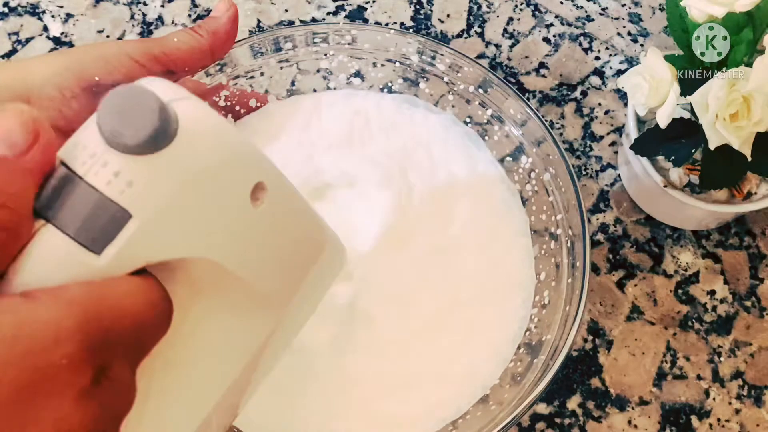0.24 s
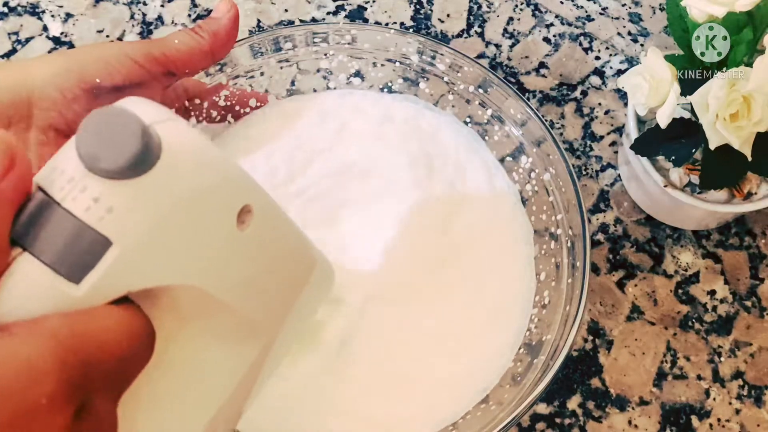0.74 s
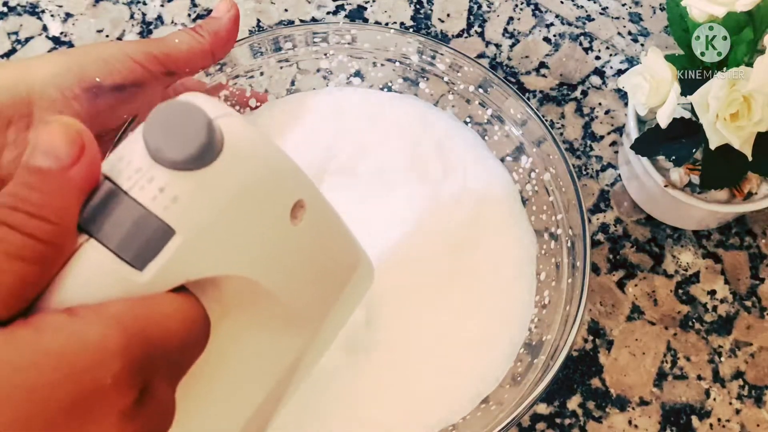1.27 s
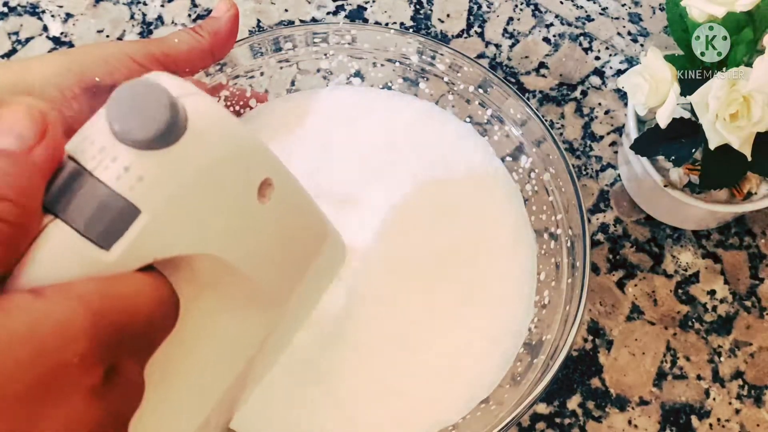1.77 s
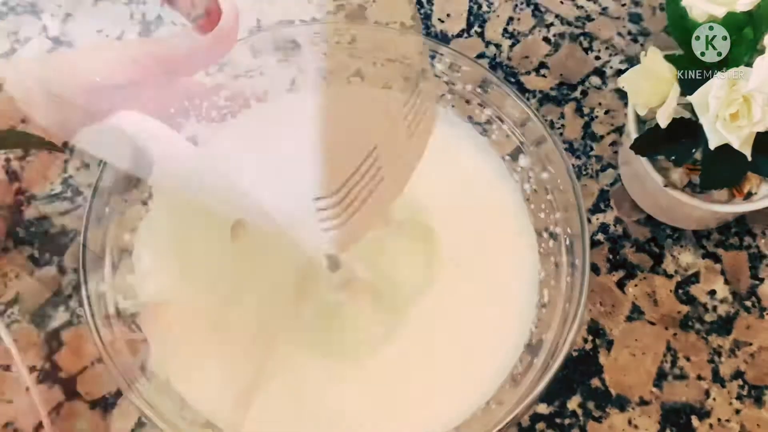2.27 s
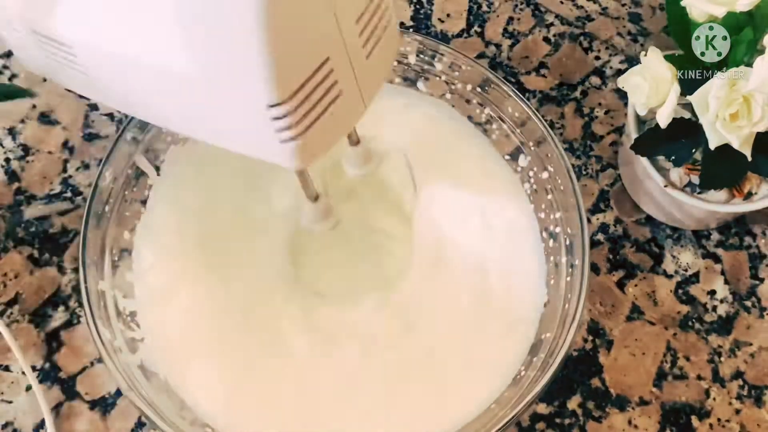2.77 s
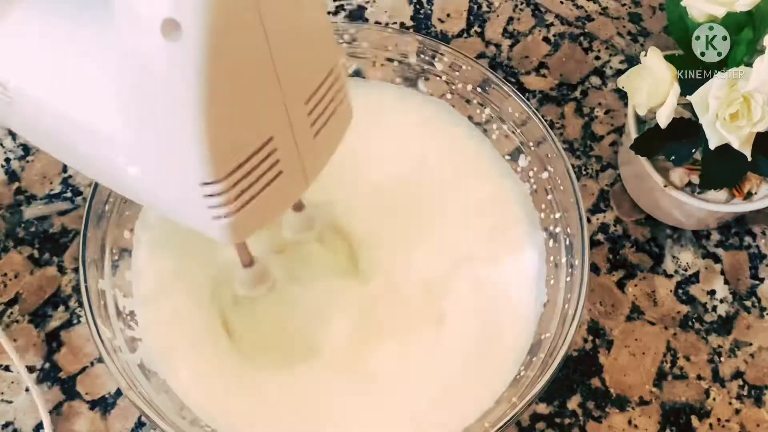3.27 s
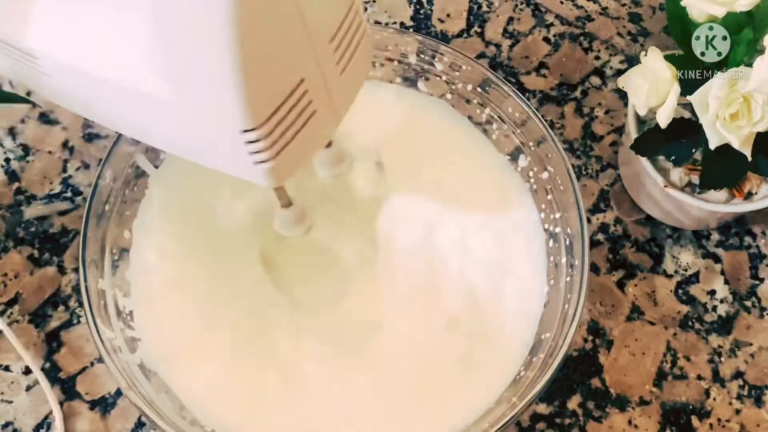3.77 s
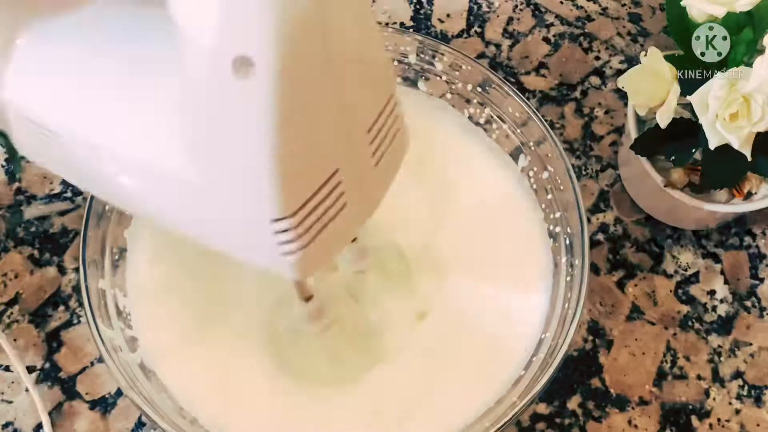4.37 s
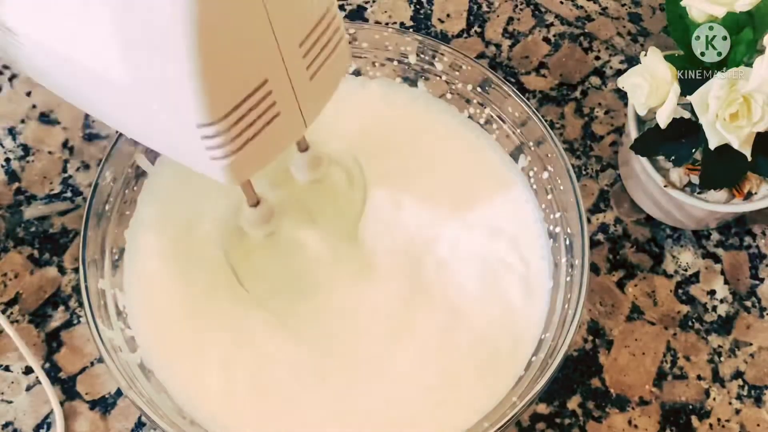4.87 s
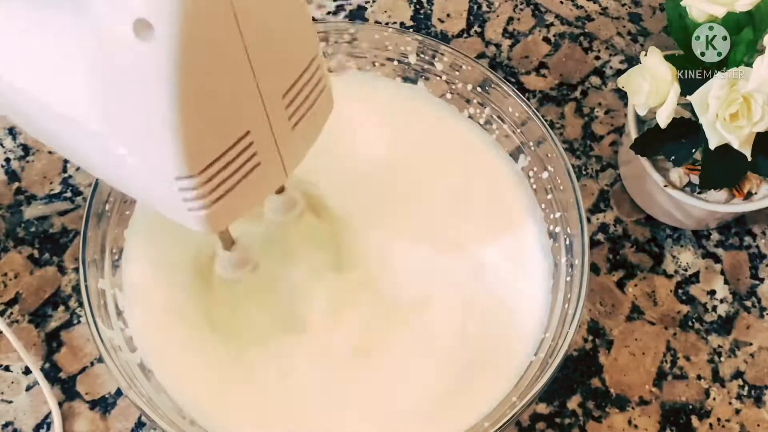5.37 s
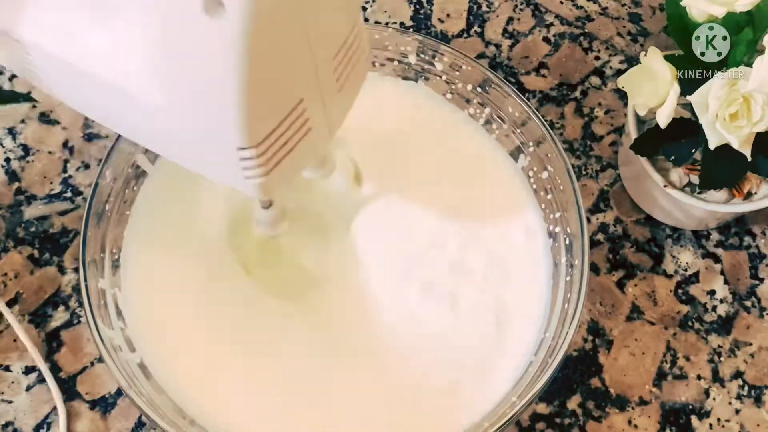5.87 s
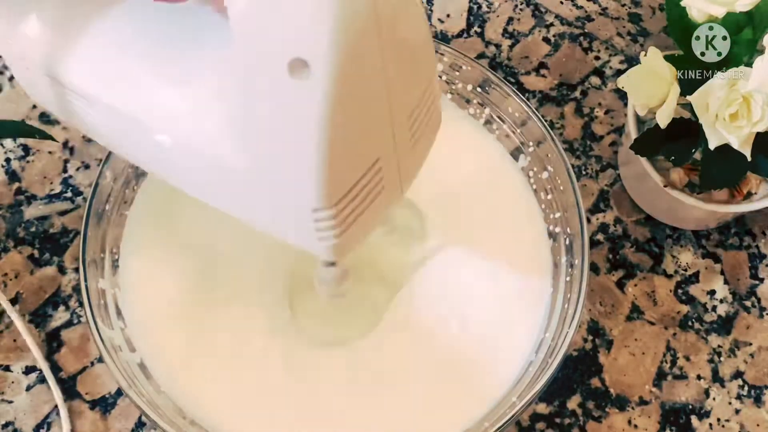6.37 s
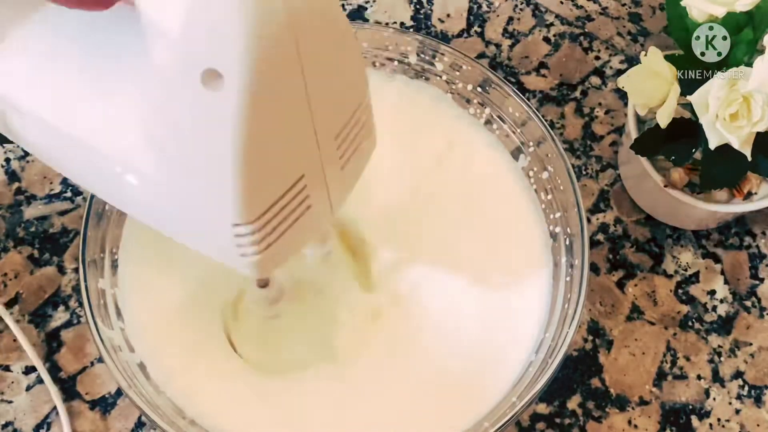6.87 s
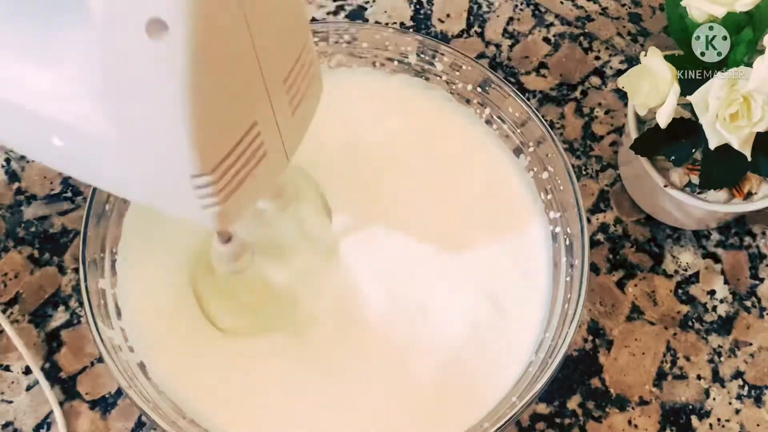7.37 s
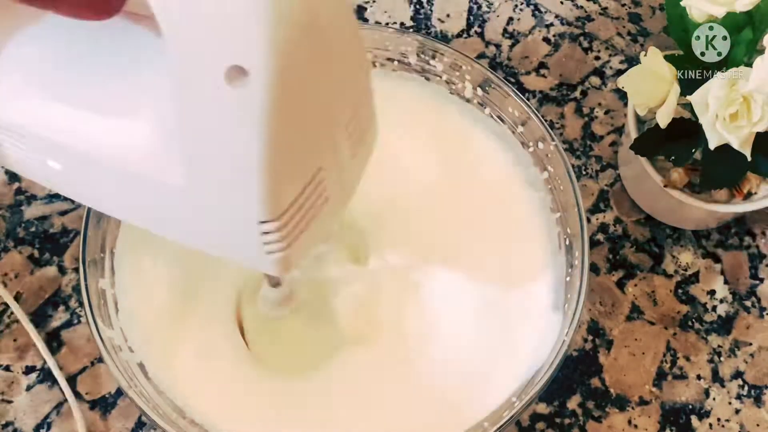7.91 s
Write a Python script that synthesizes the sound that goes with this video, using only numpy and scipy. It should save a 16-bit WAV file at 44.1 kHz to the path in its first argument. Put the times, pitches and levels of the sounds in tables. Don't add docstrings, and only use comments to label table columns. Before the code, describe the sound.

An electric hand mixer runs continuously in a glass bowl on a stone counter. At first it is very close, booming and rushing with a bright whine, spitting batter, wet slaps and glass knocks. After two seconds it blends into a much quieter, hissier view with gear rattle, small clinks and soft thuds. Close stereo microphone, dry kitchen.

```python
import sys
import numpy as np
from scipy import signal
from scipy.fft import rfft, irfft, next_fast_len
from scipy.io import wavfile
from scipy.ndimage import uniform_filter1d

SR = 44100
rng = np.random.default_rng(int(sys.argv[2]) if len(sys.argv) > 2 else 0)


def ratio_of_db(decibels):
    return 10 ** (np.asarray(decibels, float) / 20)


def output_pcm(signal):
    pcm = np.clip(np.atleast_2d(signal).T, -1, 1) * 32767
    wavfile.write(sys.argv[1], SR, np.round(pcm).astype(np.int16))


N = 358974
TIME_S = np.arange(N) / SR
SIZE = next_fast_len(N + 4096)
BINS_HZ = np.maximum(np.arange(SIZE // 2 + 1) * SR / SIZE, 1)
WIRES_PER_TURN = 0.1876


def curve(rows):
    at_s, values = np.transpose(rows)
    return np.interp(TIME_S, at_s, values)


def swells(rows, half_s):
    t = np.arange(0, N + 64, 64) / SR
    lift_db = sum(db * np.exp(-((t - s) / half_s) ** 2) for s, db in rows)
    return np.interp(TIME_S, t, lift_db)


def rms_one(x):
    return x / np.sqrt(np.mean(x ** 2) + 1e-20)


def drift(rate):
    r = np.exp(-80 * np.pi * rate / SR)
    slow = signal.lfilter([1], [1, -2 * r, r * r], rng.standard_normal(N // 40 + 2002))[2000:]
    return np.interp(np.arange(N) / 40, np.arange(len(slow)), rms_one(slow))


def shaped(x, response):
    return irfft(rfft(x, SIZE) * response, SIZE)[:N]


def slope(points):
    hz, db = np.transpose(points)
    return ratio_of_db(np.interp(np.log(BINS_HZ), np.log(hz), db))


def bell(centre_hz, width_hz):
    return 1 / (1 + (2 * (BINS_HZ - centre_hz) / width_hz) ** 2)


def air(spectrum, shell, bands, load, patchy_db):
    shell_db = sum(lift_db * bell(hz, width_hz) for hz, width_hz, lift_db in shell)
    colour = slope(spectrum) * ratio_of_db(shell_db)
    out = 0
    for low_hz, high_hz, level_db, throb in bands:
        window = np.sqrt(1 / (1 + (low_hz / BINS_HZ) ** 8) / (1 + (BINS_HZ / high_hz) ** 8))
        noise = rms_one(shaped(rng.standard_normal(N), colour * window))
        flicker = ratio_of_db(patchy_db * (drift(5.0) + drift(27)))
        out = out + ratio_of_db(level_db) * flicker * (1 + throb * load) * noise
    return out


# f/Hz, level/dB [per Hz]
NEAR_AIR_COLOUR = [(24, -57), (40, -26.5), (327, -9.5), (608, -3.5), (1340, -11.5), (2310, -9), (3310, -13),
                   (6450, -14.5), (7400, -12), (8390, -15), (12000, -13), (13800, -13.5), (14200, -19),
                   (15700, -17)]
# f/Hz, width/Hz, level/dB [over the air]
NEAR_SHELL_RINGS = [(107.4, 30, 10), (169, 25, 6.5), (287, 25, 5.5), (335, 22, 8.5), (406, 16, 6),
                    (475, 30, 0.5), (595.4, 54, 9), (643, 30, 7), (702, 19, 4), (1110, 290, 5),
                    (1732, 57, 5), (2080, 53, 2.5), (2630, 250, 4), (4490, 310, 6), (5230, 210, 3),
                    (6080, 150, 4), (12500, 500, 2)]


def near_air(load, spray):
    boom_db = -29.1 + 2.2 * spray
    air_db = -25.1 + 0.47 * spray
    hiss_db = -38 + 6 * spray
    bands = [(20, 920, boom_db + 0.63 * drift(10.6), 0.072),
             (970, 7950, air_db + 0.5, 0.12),
             (7150, 10800, hiss_db + 0.7, 0.14),
             (11500, 18000, hiss_db - 4.0 + 1.5 * drift(10), 0.12)]
    return air(NEAR_AIR_COLOUR, NEAR_SHELL_RINGS, bands, load, patchy_db=0.43)


def beaters_raised():
    raise_s, takes_s = 5.74, 0.05
    return 0.5 + 0.5 * np.tanh((TIME_S - raise_s) / takes_s)


# f/Hz, level/dB [per Hz]
FAR_AIR_COLOUR = [(35, -95), (60, -72), (180, -37), (394, -12.5), (889, -15), (1120, -6.5), (2050, -13),
                  (2530, -4.5), (3930, -11), (5500, -10.5), (7370, -5.5), (10700, -8), (13500, -8),
                  (15700, -8.5)]
# f/Hz, width/Hz, level/dB [over the air]
FAR_SHELL_RINGS = [(402, 27, 3), (679.6, 25, 8), (1318, 39, 8.5), (1620, 59, 6), (1940, 49, 4),
                   (4370, 260, 4), (4870, 520, 2.5), (5520, 190, -8.5), (7500, 110, 3.5), (7960, 47, -4),
                   (8460, 67, -8), (10740, 400, 6), (11500, 300, 0), (13200, 470, 2.5)]
# t/s, level/dB [lift]
BOWL_ROCKING = [
    (2.7, 2.5),
    (4.04, 2.5),
    (4.42, 6),
    (5.04, 4),
    (6.2, 6),
    (6.44, 12),
    (6.86, 11),
    (7.1, 9),
    (7.3, 5),
    (7.64, 5),
]


def far_air(load):
    air_db = -39
    hiss_db = -38.5 - 0.27 * beaters_raised()
    rumble_db = -70.5 + swells(BOWL_ROCKING, half_s=0.15)
    bands = [(20, 208, rumble_db - 0.3, 0.04),
             (234, 3610, air_db + 2.0, 0.027),
             (3550, 8600, hiss_db + 0.45, 0.04),
             (9760, 14700, hiss_db + 1.5, 0.065)]
    return air(FAR_AIR_COLOUR, FAR_SHELL_RINGS, bands, load, patchy_db=0.56)


def strikes(events, modes, low_hz, soft_hz, spread_db):
    at_s, peak_db = np.transpose(events)
    at = (at_s * SR).astype(int)
    luck = rng.standard_normal((len(at), len(modes)))
    rub = rng.choice([-1, 1], N)
    contact_s = 0.00002
    fading = np.exp(-1 / (contact_s * SR))
    out = np.zeros(N)
    for k, (hz, level_db, t60) in enumerate(modes):
        clicks = np.full(N, 1e-18)
        clicks[at] = ratio_of_db(peak_db + level_db + spread_db * luck[:, k])
        push = rub * signal.lfilter([np.sqrt(1 - fading ** 2)], [1, -fading], clicks)
        r = ratio_of_db(-60 / (t60 * SR))
        w = 2 * np.pi * hz / SR
        out += (-1) ** k * signal.lfilter([0, np.sin(w)], [1, -2 * r * np.cos(w), r * r], push)
    band = signal.butter(4, [low_hz, soft_hz], "band", fs=SR, output="sos")
    return signal.sosfilt(band, out)


# t/s, level/dB [peak]
BOWL_THUDS = [(.655, -28), (3.3, -59), (3.65, -61), (4.345, -48), (4.39, -50), (4.455, -45), (4.98, -60),
              (6.43, -36), (6.47, -37), (6.53, -41), (6.875, -36), (6.94, -40), (7.02, -39), (7.195, -43),
              (7.36, -41), (7.795, -42.5), (8.02, -49)]
# f/Hz, level/dB, time to fade by 60 dB/s
COUNTER_MODES = [(255.5, 5, 0.26), (290, 0, .25), (227, -7, .12), (185, -20, 0.11), (442, -6, .1),
                 (520, -5, .1)]


def counter_thuds():
    return ratio_of_db(-11.5) * strikes(BOWL_THUDS, COUNTER_MODES, low_hz=170, soft_hz=650, spread_db=2.0)


# t/s, level/dB [peak]
BATTER_SLAPS = [
    (.635, -24),
    (.733, -17),
    (.97, -30),
    (1.335, -23.5),
    (1.535, -25),
    (1.995, -24),
    (2.072, -22),
]
# f/Hz, level/dB, time to fade by 60 dB/s
BATTER_MODES = [(614, -16, 0.055), (920, 2, 0.065), (1094, 4.5, 0.073), (1190, 2, 0.066)]


def batter_slaps():
    return ratio_of_db(-5.5) * strikes(BATTER_SLAPS, BATTER_MODES, low_hz=400, soft_hz=1600, spread_db=3.0)


# t/s, level/dB [peak]
WIRE_KNOCKS = [(0.0664, -12), (0.1404, -10.5), (0.8054, -13), (0.8794, -15), (1.6884, -13), (1.8317, -10),
               (3.438, -25), (3.6794, -23), (4.356, -24), (4.4148, -18), (4.447, -19), (4.4547, -22),
               (4.798, -21), (4.8074, -14.5), (4.8122, -14.5), (4.816, -20), (5.8391, -26), (5.8514, -20),
               (6.024, -13), (6.0651, -20), (6.2516, -18.5), (6.4514, -16), (6.455, -16), (6.495, -19),
               (6.6548, -28), (6.787, -25), (7.2494, -18), (7.3483, -16), (7.6906, -22)]
# f/Hz, level/dB, time to fade by 60 dB/s
GLASS_MODES = [(1110, -11, 0.011), (1510, -9.5, .012), (1945, -8.5, 0.053), (2360, -3.5, .015),
               (2530, -5.5, .018), (2700, -0.5, 0.017), (2950, -13, .012), (3920, -9, .008),
               (5100, -5, .005), (7800, -2, .004), (10300, -5, .004), (12500, 0, .004)]


def glass_knocks():
    return ratio_of_db(-8.0) * strikes(WIRE_KNOCKS, GLASS_MODES, low_hz=900, soft_hz=14500, spread_db=2.5)


def flicks(turns, spray):
    cycle = 0.0929 * turns + 0.21
    level_db = 1.5 * rng.standard_normal(400) + 4 * (-1) ** np.arange(400)
    strength = ratio_of_db(level_db)[cycle.astype(int)]
    since_s = (cycle % 1) / np.gradient(cycle) / SR
    fade_s = 0.002
    puffs = strength * np.exp(-since_s / fade_s) * np.clip(spray, 0, 1) ** 2 * rng.standard_normal(N)
    bright = signal.butter(2, 7000, "high", fs=SR, output="sos")
    return ratio_of_db(-22) * signal.sosfilt(bright, puffs)


# t/s, level/dB
STIRRING = [(2.64, -45), (3.24, -40.5), (3.5, -38.5), (4.04, -38), (4.24, -39.5), (4.44, -37), (4.64, -40),
            (5.0, -36), (5.3, -40.5), (5.64, -38.5), (6.04, -35), (6.24, -38.5), (6.44, -33), (6.64, -38),
            (7.04, -38), (7.24, -33.5), (7.44, -40.5), (7.66, -35)]
# f/Hz, width/Hz, level/dB
GEAR_CASE_MODES = [(2310, 190, -6), (2540, 220, -1), (2874, 45, 1.5), (3144, 40, -1.5), (3403, 67, -7.5)]


def gear_rattle(wires):
    case = np.sqrt(sum(ratio_of_db(2 * db) * bell(hz, width_hz) ** 2 for hz, width_hz, db in GEAR_CASE_MODES))
    bunching = ratio_of_db(3.0 * np.cos(wires + 0.8 * drift(8)) + 2.2 * drift(14))
    contacts = rng.random(N) < 900 * bunching / SR
    sizes = rng.standard_normal(N) * ratio_of_db(2.0 * np.minimum(rng.exponential(1, N), 4))
    return ratio_of_db(curve(STIRRING) - 3.0) * rms_one(shaped(contacts * sizes, case))


def whine(turns, levels, faint, wobble, waver_db):
    angle = 2 * np.pi * turns + wobble * drift(24)
    out = 0
    for k, db in list(levels) + list(faint):
        wavering_db = db + waver_db * np.sqrt(k) * drift(11.4)
        out = out + np.sqrt(2) * ratio_of_db(wavering_db) * np.sin(k * angle + k * k)
    return out


NEAR_WHINE_LEVELS = [-35, -40, -39.5, -35, -43]
# t/s, level/dB [lift]
NEAR_WHINE_BEAMS = [
    [(.2, -3.5), (.55, 2), (.8, 5), (1.1, 4), (1.27, 1.5), (1.44, 5), (1.62, 1.5), (1.9, -4), (2.16, 3.5)],
    [(.5, 6.5), (1.03, 6.5), (1.68, 3), (2.1, 2)],
    [(.12, 2), (.77, 8.5), (1.08, 3), (1.33, -5), (1.68, 4.5), (1.9, 0), (2.2, 2.5)],
    [(.1, 2), (.34, -2), (.53, 7), (1.43, 5.5), (2.15, 3)],
    [(.05, 8.5), (.57, 7), (1.1, 6.5), (1.45, 3), (2.3, 6)],
]
# multiple of the rotor speed, level/dB
NEAR_FAINT_WHINES = [(32, -53), (48, -49), (1, -49)]


def near_whine(turns):
    levels_db = [db + swells(beams, half_s=0.11) for db, beams in zip(NEAR_WHINE_LEVELS, NEAR_WHINE_BEAMS)]
    levels = zip((8, 12, 16, 24, 36), levels_db)
    return whine(turns, levels, NEAR_FAINT_WHINES, wobble=0.0073, waver_db=0.34)


FAR_WHINE_LEVELS = [-46.5, -56.5, -49.5, -53]
RAISED_WHINE_LIFTS = [-1.5, 9, 4.5, 6]
# t/s, level/dB [lift]
FAR_WHINE_BEAMS = [
    [(2.72, 2), (3.5, 3.1), (4.1, 2.7), (4.65, 1.99), (5.0, 4.5), (5.7, 3)],
    [(2.55, -7), (3.15, 6), (3.6, 8.5), (4.4, -1), (5.05, 5), (6.05, 1), (7.7, 1)],
    [(2.6, 8), (2.87, 5.5), (3.1, 2), (3.7, -4), (4.3, 6), (4.58, 4), (5.4, -2), (5.88, 6), (6.47, -4),
     (6.92, 3), (7.2, 1), (7.42, 1), (7.85, -3)],
    [(3.03, -7), (3.3, 4), (4.1, 3), (5.25, 5), (6.35, -3), (6.9, 3), (7.85, -5)],
]
# multiple of the rotor speed, level/dB
FAR_FAINT_WHINES = [(24, -62)]


def far_whine(turns, wires):
    raised = beaters_raised()
    gear_db, slot_db, bar_db, top_db = [
        db + lift_db * raised + swells(beams, half_s=0.1)
        for db, lift_db, beams in zip(FAR_WHINE_LEVELS, RAISED_WHINE_LIFTS, FAR_WHINE_BEAMS)]
    levels = zip((4, 32, 48), (gear_db, bar_db, top_db))
    tones = whine(turns, levels, FAR_FAINT_WHINES, wobble=0.014, waver_db=0.55)
    shake = 1 + 0.99 * np.cos(wires)
    slot_tone = np.sin(16 * np.pi * turns + 0.2 * np.sin(wires))
    return tones + np.sqrt(2) * ratio_of_db(slot_db + 2.5) * shake * slot_tone


# t/s, f/Hz
NEAR_ROTOR_SPEED = [(0, 290.2), (.2, 290.4), (.6, 292.15), (.83, 291.2), (1.5, 293.4), (1.79, 290.8),
                    (2.0, 291.0), (2.25, 292.5), (2.55, 291.0)]
# t/s, strength [0-1]
BATTER_SPRAY = [
    (0, 0.8),
    (.1, .8),
    (.52, 0.11),
    (.63, 1),
    (.92, .95),
    (1.24, .15),
    (1.55, 0.9),
    (1.79, 0.92),
    (1.9, .05),
    (2.1, 0.2),
]


def near_shot():
    turns = np.cumsum(curve(NEAR_ROTOR_SPEED)) / SR
    spray = curve(BATTER_SPRAY)
    load = np.sin(2 * np.pi * WIRES_PER_TURN * turns + 1.3 * drift(4.3))
    return near_air(load, spray) + flicks(turns, spray) + near_whine(turns)


# t/s, f/Hz
FAR_ROTOR_SPEED = [(2.6, 282.8), (2.76, 281.4), (3.1, 280.9), (3.62, 283.2), (4.0, 282), (4.4, 281.2),
                   (4.53, 282.7), (4.85, 282.1), (5.0, 283.9), (5.42, 282.6), (5.5, 283.6), (5.85, 284.8),
                   (6.05, 286.9), (6.95, 286.9), (7.2, 288.3), (7.4, 287), (7.57, 289.3), (7.8, 286.8)]


def far_shot():
    turns = np.cumsum(curve(FAR_ROTOR_SPEED)) / SR
    wires = 2 * np.pi * WIRES_PER_TURN * turns
    return far_air(np.cos(wires)) + gear_rattle(wires) + far_whine(turns, wires)


def ports(x, table, lean, diffuse):
    turn = np.exp(2j * np.pi * uniform_filter1d(rng.standard_normal(len(BINS_HZ)), size=9) * 3)
    share = np.clip(diffuse, 0, 1)
    ratio = slope(table)
    tilt = slope(lean)
    mid = (BINS_HZ < 15725) / np.sqrt(1 + ratio ** 2)
    side = mid * ratio * (1j * np.sqrt(1 - share) + np.sqrt(share) * turn)
    side = side + mid * (tilt - 1) / (tilt + 1)
    return np.array([shaped(x, mid + side), shaped(x, mid - side)])


# f/Hz, level/dB [side over mid]
NEAR_PORT_SIDES = [(600, -7), (1400, -11), (2200, -26), (3000, -12), (4700, -14), (5600, -24), (7800, -28),
                   (8300, 1), (10100, -4), (10700, -30), (11900, -8), (12500, 0), (12950, 28), (13750, 30),
                   (14000, 2), (14800, -17)]
FAR_PORT_SIDES = [(60, -19), (400, -16), (800, -10), (1300, -14), (2300, -8), (3000, -4), (4300, -9),
                  (5200, -24), (9000, -28), (13700, -27), (15500, -32)]
# f/Hz, level/dB [left minus right]
NEAR_PORT_LEAN = [(60, -1), (130, -4.5), (290, 0), (640, -2.5), (1410, -1.5), (3100, -1), (6820, 1.5),
                  (15000, 0.0)]
FAR_PORT_LEAN = [(60, 0.0), (130, 1), (290, -1.3), (640, -1), (1410, -0.5), (3100, -2.2), (6820, 0.5),
                 (15000, 2)]
# t/s, gain
NEAR_FADE_OUT = [
    (2.08, 0.87),
    (2.3, 0.55),
    (2.5, 0.2),
    (2.66, 0.0012),
]
FAR_FADE_IN = [
    (2.1, .001),
    (2.35, 0.42),
    (2.56, 0.8),
    (2.6, 1.13),
]


def scene():
    bowl = counter_thuds() + glass_knocks()
    far = ports(bowl + far_shot(), FAR_PORT_SIDES, FAR_PORT_LEAN, diffuse=0.62)
    near = ports(bowl + batter_slaps() + near_shot(), NEAR_PORT_SIDES, NEAR_PORT_LEAN, diffuse=0.42)
    return curve(NEAR_FADE_OUT) * near + curve(FAR_FADE_IN) * far


def top_cut(x):
    return signal.sosfilt(signal.butter(12, 16520, fs=SR, output="sos"), x)


def record(dry):
    return top_cut(dry)


dry = scene()
out = record(dry)
output_pcm(out)
```